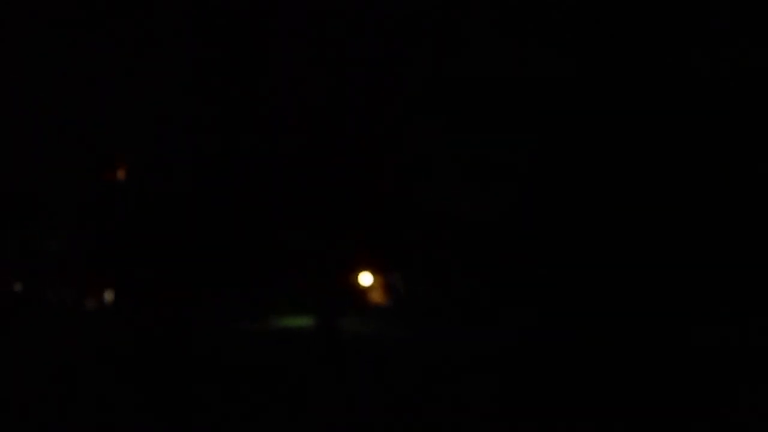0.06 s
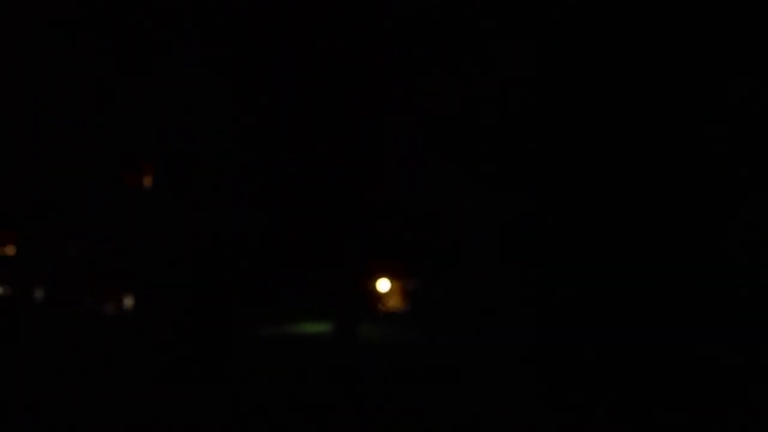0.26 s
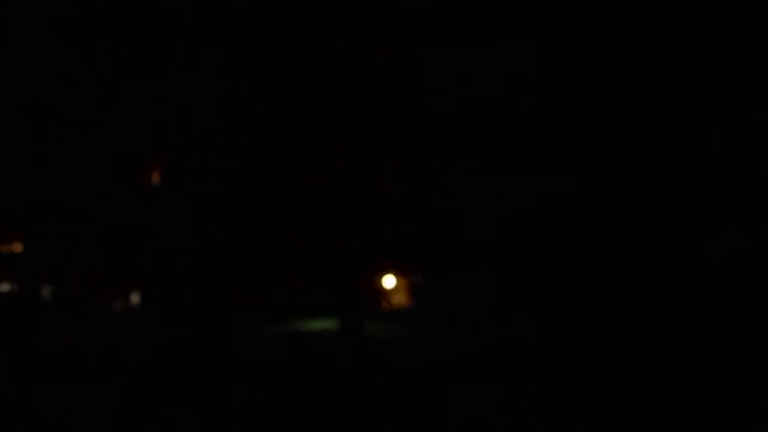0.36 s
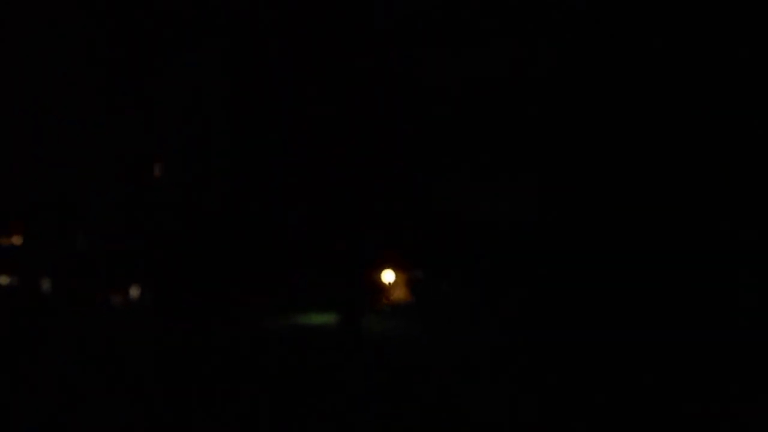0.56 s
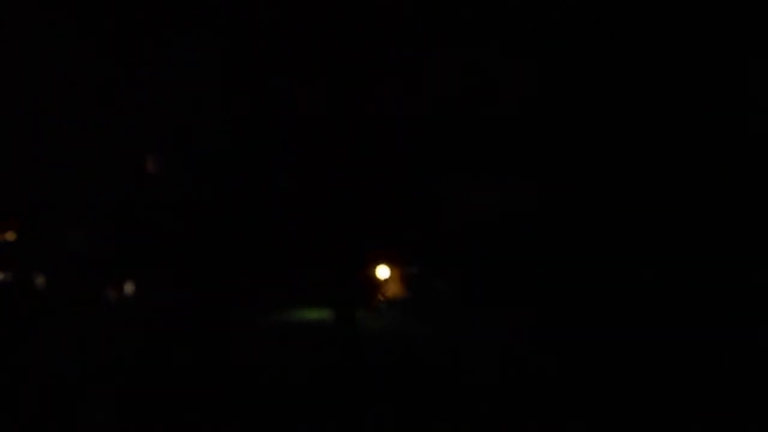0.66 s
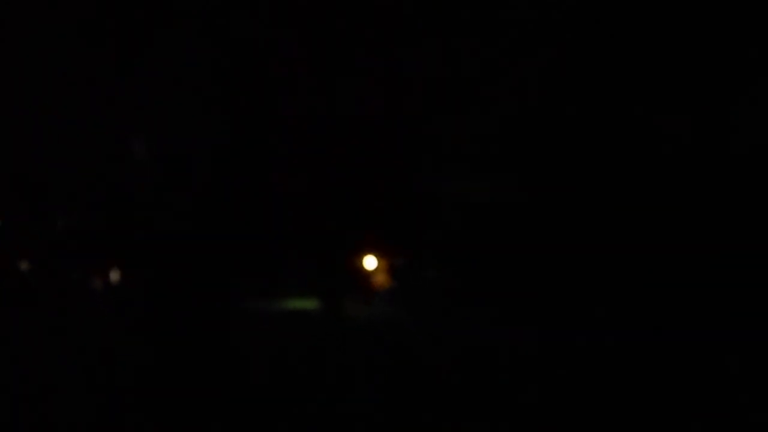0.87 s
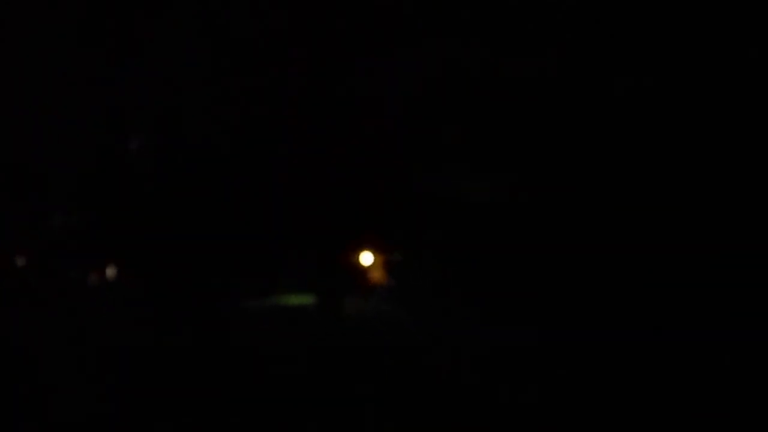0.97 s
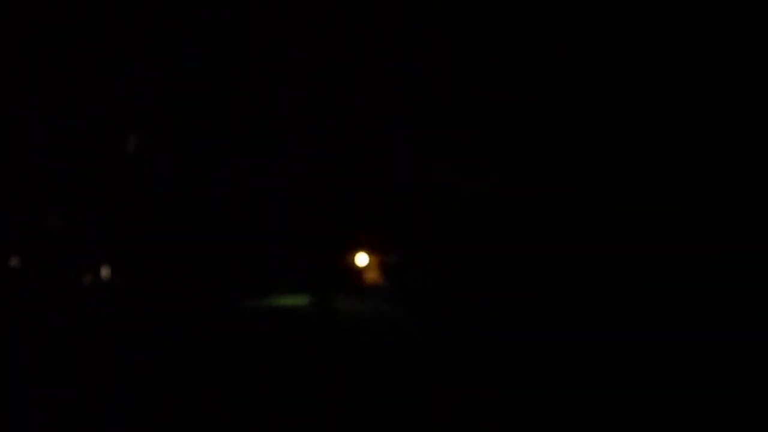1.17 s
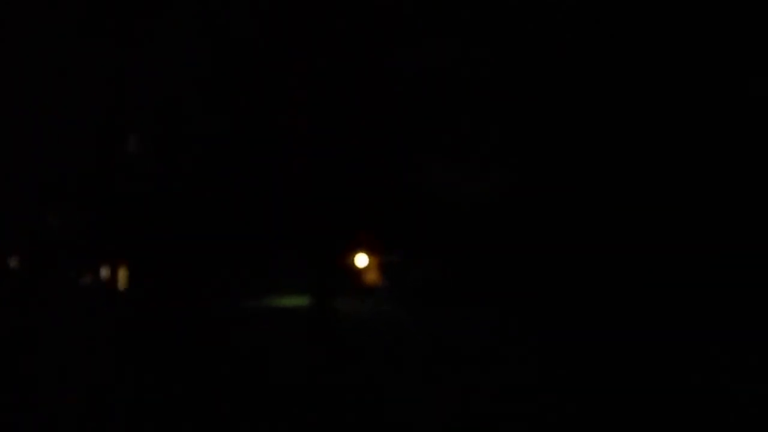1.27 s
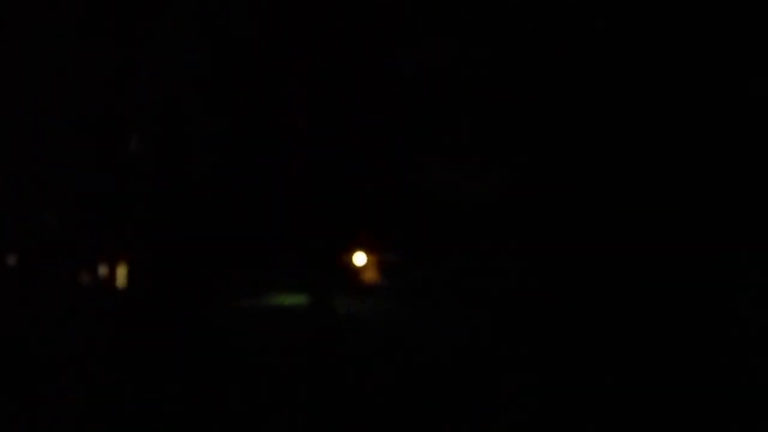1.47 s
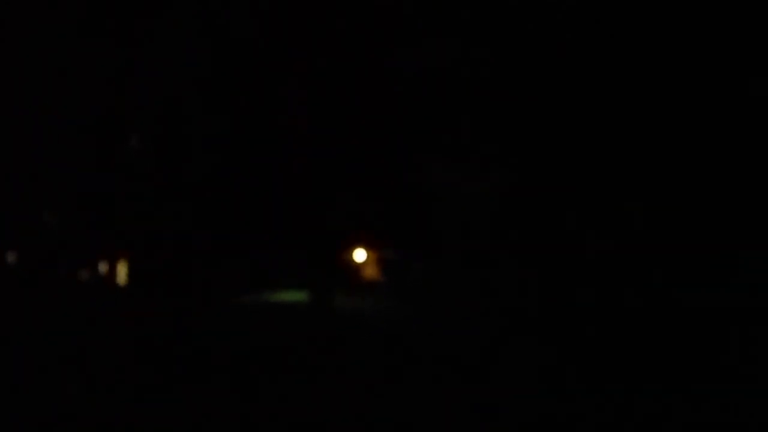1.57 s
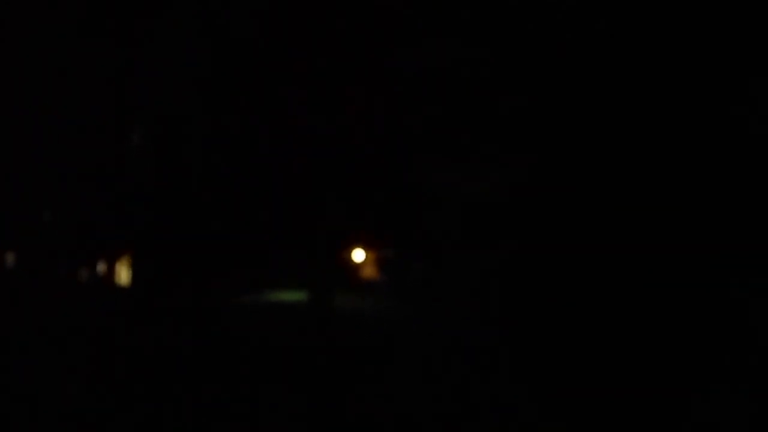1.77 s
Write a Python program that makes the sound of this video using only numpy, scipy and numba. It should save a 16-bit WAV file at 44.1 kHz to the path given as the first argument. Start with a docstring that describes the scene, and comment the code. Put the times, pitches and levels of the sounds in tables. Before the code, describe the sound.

One rough fox bark echoes far off, above steady night insects and a low town murmur.

```python
"""A fox gives one hoarse bark far off at night: uneven vocal-fold pulses and breath excite its throat
resonances, and trees and houses scatter the sound into a long, dull tail. Crickets trill and two
katydids rasp, each at its own pace, their wing strokes driving narrow resonances, over the low murmur
and hum of a town. Two close microphone ports hear the middle range almost in opposite phase."""
import sys
import numpy as np
from scipy import signal
from scipy.fft import rfft, irfft
from scipy.io import wavfile
from scipy.ndimage import uniform_filter1d
from numba import njit

SR = 44100
rng = np.random.default_rng(int(sys.argv[2]) if len(sys.argv) > 2 else 0)


def materialize(psi):
    """Save the field psi as 16-bit PCM at rate SR to the path in sys.argv[1].

    A 1-D psi becomes a single channel; in a 2-D psi each row is a channel.
    """
    bounded = np.clip(np.atleast_2d(psi).T, -1, 1)
    quanta = np.round(bounded * 32767).astype(np.int16)
    wavfile.write(sys.argv[1], SR, quanta)


N = 79380
TIME_S, BIN_HZ = np.arange(N) / SR, np.arange(N // 2 + 1) * SR / N

# Spectrum of the town's murmur: frequency_hz, relative_density_db
MURMUR_SPECTRUM = [(22, -16), (33, -6), (45, -15), (70, 0.5), (120, -3.5), (200, -5.5), (290, -6.5),
                   (420, 4), (550, -0.5), (750, -1), (1100, -5.5), (1800, -11.5), (2900, -13.5),
                   (4200, -21.5), (5400, -18.5), (6000, -31), (7000, -25.5), (9000, -35.5), (10500, -27.5),
                   (12300, -37), (14300, -33.5), (15700, -25)]
# Loudness of the tree crickets: time_s, level_db
TREE_CRICKET_LEVEL = [(0, -50), (.2, -51.5), (.45, -44), (.7, -46.5), (.9, -49.5), (1.2, -47.5),
                      (1.4, -46.5), (1.62, -45.5), (1.8, -49.5)]
# Higher trills: pitch_hz, width_hz, pulse_rate_hz, depth_ratio, start_db, end_db
HIGH_TRILLS = [(5533, 370, 35, 0.06, -57, -66), (7874, 780, 91, 0, -57, -56),
               (9210, 340, 70, 0.16, -67.5, -72), (12600, 330, 55, .3, -80, -86)]
# Chirps of the lower katydid: centre_s, length_s, level_db
LOW_KATYDID_CHIRPS = [(.11, 0.097, -53), (0.362, 0.1, -54.5), (0.538, 0.076, -52.5), (0.724, 0.09, -51),
                      (0.803, .07, -52.5), (1.002, .09, -50), (1.275, .11, -52), (1.514, 0.098, -52),
                      (1.78, 0.1, -51.5)]
# Envelope of the bark: time_s, relative_level_db
BARK_EFFORT = [(.205, -30), (.24, -4), (.27, 4.5), (.31, 2), (.355, 2), (.42, -2.5), (.47, -3), (.54, -6.5),
               (.6, -21)]
# Lowest throat resonance as the jaw moves: time_s, centre_hz
JAW_FORMANT = [(.23, 927.6), (.28, 1030), (.345, 1090), (.45, 1099), (.56, 1106)]
# Upper throat resonances: centre_hz, width_hz, open_mouth_gain_db
UPPER_FORMANTS = [(1484, 305, -1), (1740, 320, -1.5), (2290, 200, -21), (2640, 400, -12.5),
                  (3205, 490, -20), (3865, 640, -20), (4870, 590, -33)]
# Scattered sound, near to far: rise_s, bass_t60_s, treble_loss_db_per_khz_per_s, gain_db
SCATTER_PATHS = [(.008, 0.29, 15.5, -6.5), (.05, 1.36, 2, -3), (.2, 2.23, -6.5, -24)]
# Likeness of the left and right channels: frequency_hz, coherence_ratio (capped at 1)
CHANNEL_COHERENCE = [(50, 1.36), (200, 0.6), (290, 0.74), (420, 0.8), (1100, 0.94), (2300, 0.56),
                     (3200, 0.46), (6000, 0.3), (8000, 0.9), (15000, 0.5)]
# Level difference of the channels: frequency_hz, left_minus_right_db
CHANNEL_BALANCE = [(60, 3), (400, 3.5), (1200, 3.5), (2300, -1.2), (4400, -1.5), (8000, -1.1), (15000, 1)]
# Phase difference for town and insects: frequency_hz, left_lead_rad
CHORUS_PHASE = [(60, 0.5), (210, -0.23), (290, 2), (380, 4), (1400, 2.5), (2250, 1.55), (3400, 3.5),
                (5500, -1.04), (8000, -1)]
# Phase difference for the fox: frequency_hz, left_lead_rad
FOX_PHASE = [(400, 2.2), (750, 2.04), (1100, 2.2), (2000, 2.03), (3500, 1.48), (5500, .2)]


def undb(db):
    """Amplitude grows tenfold every 20 decibels."""
    return 10 ** (np.asarray(db) / 20)


def unit(x):
    """Normalisation to an rms of 1."""
    return x / np.sqrt(np.mean(x ** 2))


def curve(rows):
    """Linear interpolation of (time_s, value) points."""
    return np.interp(TIME_S, *np.array(rows).T)


def per_bin(rows):
    """Interpolation of (frequency_hz, value) points on a logarithmic frequency axis."""
    hz, value = np.array(rows).T
    return np.interp(np.log(BIN_HZ + 1), np.log(hz), value)


def wander(rate_hz):
    """Smoothed random steps give a fluctuation with a spread near 1."""
    hold = int(SR / rate_hz)
    steps = rng.standard_normal(2048)[np.arange(N) // hold]
    return 1.3 * uniform_filter1d(uniform_filter1d(steps, hold), hold)


def noise_band(hz, width_hz):
    """Random excitation of a steep-sided resonance, as two independent signals."""
    detuning = 2 * np.abs(BIN_HZ - hz) / width_hz
    return unit(irfft(rfft(rng.standard_normal((2, N))) / np.sqrt(1 + detuning ** 5), N))


def throb(rate_hz, depth, jitter):
    """Amplitude modulation at an unsteady rate."""
    cycles = np.cumsum(rate_hz * (1 + jitter * wander(rate_hz))) / SR + rng.random()
    return unit(1 + depth * np.cos(2 * np.pi * cycles))


def town():
    """Superposition of a wavering broadband murmur, mains hum and a distant narrowband drone."""
    murmur = unit(irfft(rfft(rng.standard_normal((2, N))) * undb(per_bin(MURMUR_SPECTRUM)), N))
    murmur *= undb(-42 - 0.5 * wander(10))
    hum = undb(-55) * unit(np.sin(2 * np.pi * 60.2 * TIME_S))
    drone = undb(-60) * noise_band(hz=413.4, width_hz=5.3)
    return murmur + np.array([hum, np.zeros(N)]) + drone


def crickets():
    """Many distant trills add incoherently into pulsing bands, the tree crickets lowest and loudest."""
    def trill(db, hz, width_hz, rate_hz, depth):
        return undb(db + wander(11.8)) * noise_band(hz, width_hz) * throb(rate_hz, depth, jitter=0.296)

    tree = trill(curve(TREE_CRICKET_LEVEL), hz=2284, width_hz=202, rate_hz=52, depth=0.23)
    return tree + sum(trill(np.linspace(start_db, end_db, N), *song)
                      for *song, start_db, end_db in HIGH_TRILLS)


def chirp(centre_s, length_s, hz, width_hz):
    """Stridulation: a swell of wing strokes drives a high resonance."""
    swell = np.exp(-np.abs((TIME_S - centre_s) / (length_s * np.sqrt(.5))) ** 3)
    return swell * noise_band(hz, width_hz) * throb(rate_hz=82, depth=0.3, jitter=0.285)


def katydids():
    """Two katydids stridulate at their own pace; the higher one keeps a strict period."""
    low = sum(undb(db) * chirp(centre_s, length_s, hz=8020, width_hz=440)
              for centre_s, length_s, db in LOW_KATYDID_CHIRPS)
    high = sum(chirp(centre_s=0.088 + k * 0.371, length_s=0.081, hz=8500, width_hz=370) for k in range(5))
    return low + undb(-54.5) * high


@njit
def band_pass(x, hz, width_hz):
    """Two integrators in a loop form a damped resonator with a moving centre."""
    y, band_state, low_state = np.empty(len(x)), 0., 0.
    for i in range(len(x)):
        gain, damping = np.tan(np.pi * hz[i] / SR), width_hz / hz[i]
        band = (band_state + gain * (x[i] - low_state)) / (1 + gain * (gain + damping))
        band_state = 2 * band - band_state
        low_state += 2 * gain * band
        y[i] = damping * band
    return y


def formant(x, hz, width_hz):
    """Two resonators in cascade, each width_hz wide, give steep skirts."""
    hz, width_hz = hz * np.ones(N), float(width_hz)
    return band_pass(band_pass(x, hz, width_hz), hz, width_hz)


def vocal_tract(airflow, rasp):
    """Throat and chest resonances filter the airflow; the treble comes in as the mouth opens."""
    opens_s, opening_time_s, closed_db_per_octave = 0.23, 0.087, -14
    closed = 1 - np.clip((TIME_S - opens_s) / opening_time_s, 0, 1)
    voice = undb(-0.5) * (1 - closed / 2) * formant(airflow, curve(JAW_FORMANT), width_hz=313)
    voice += undb(-14) * formant(airflow, hz=630, width_hz=310)  # chest
    voice += undb(-3) * closed * formant(rasp, hz=1120, width_hz=890)  # rasp of the still narrow mouth
    for k, (hz, width_hz, db) in enumerate(UPPER_FORMANTS, 1):
        muffling_db = closed * closed_db_per_octave * np.log2(hz / 1090)
        voice += undb(db + muffling_db) * formant(np.roll(airflow, 97 * k), hz, width_hz)
    return unit(voice)


def fox():
    """Source and filter: uneven fold pulses and rattling air ring the throat; a rough tone joins in."""
    fold_hz, rasp_share = 369.6, 0.57
    cycles = np.cumsum(fold_hz * (1 + 0.13 * wander(fold_hz))) / SR
    pulses = unit(np.diff(np.floor(cycles), prepend=0))
    rasp = unit(rng.standard_normal(N) * np.exp(-(cycles % 1) / 0.32))  # a puff after each pulse
    rattle = throb(rate_hz=45.96, depth=0.58, jitter=0.207)
    airflow = (np.sqrt(1 - rasp_share) * pulses + np.sqrt(rasp_share) * rasp) * rattle
    cry_hz = curve(JAW_FORMANT) * (1 + 0.03 * wander(200))
    cry = unit(np.sin(2 * np.pi * np.cumsum(cry_hz) / SR)) * rattle
    cry *= np.exp(-.5 * ((TIME_S - 0.3815) / 0.035) ** 2)  # a brief swell in mid-bark
    barking = (TIME_S > BARK_EFFORT[0][0]) & (TIME_S < BARK_EFFORT[-1][0])
    effort = undb(curve(BARK_EFFORT)) * barking
    return vocal_tract(airflow, rasp) * effort + undb(0.5) * cry


def scattering(x):
    """Reverberation: trees and houses add diffuse tails and a lingering echo to the direct sound."""
    def swell(t, rise_s, t60_s):
        return (1 - np.exp(-t / rise_s)) * np.exp(-np.log(1000) * t / t60_s)

    hz, delay_s, noise = signal.stft(rng.standard_normal((2, N)), SR, nperseg=256)
    echo_hz, echo_width_hz = 1093, 70  # the farthest echoes carry only the strongest band
    echo = unit(noise_band(echo_hz, echo_width_hz) * swell(TIME_S, rise_s=0.39, t60_s=4.06))
    response = undb(-8.5) * echo * np.sqrt(2 * echo_width_hz / SR)
    for rise_s, t60_s, treble_loss, db in SCATTER_PATHS:
        decay = swell(delay_s, rise_s, t60_s) * undb(-treble_loss * np.outer(hz / 1000, delay_s))
        response += undb(db) * unit(signal.istft(noise * decay, SR)[1][:, :N])
    tail = signal.fftconvolve(response / np.sqrt(N), x[None], axes=1)[:, :N]
    return tail + undb(1.5) * np.array([x, np.zeros(N)])


def stereo(pair, phase_table):
    """Partial coherence: left and right are a pair's sum and difference, offset in phase and level."""
    common, opposed = rfft(pair)
    coherence = np.clip(per_bin(CHANNEL_COHERENCE), 0, 1)
    common *= np.sqrt((1 + coherence) / 2)
    opposed *= np.sqrt((1 - coherence) / 2)
    offset = np.exp(.5j * per_bin(phase_table)) * undb(per_bin(CHANNEL_BALANCE) / 2)
    return irfft(np.array([(common + opposed) * offset, (common - opposed) / offset]), N)


def scene():
    """Superposition of the scattered bark and the night chorus."""
    bark = undb(-30.5) * stereo(scattering(fox()), FOX_PHASE)
    return bark + stereo(katydids() + crickets() + town(), CHORUS_PHASE)


def record(dry):
    """Band limiting: a sharp low-pass filter removes the highest treble."""
    cutoff_hz = 15780
    return irfft(rfft(dry) * (BIN_HZ < cutoff_hz), N)


dry = scene()
out = record(dry)
materialize(out)
```